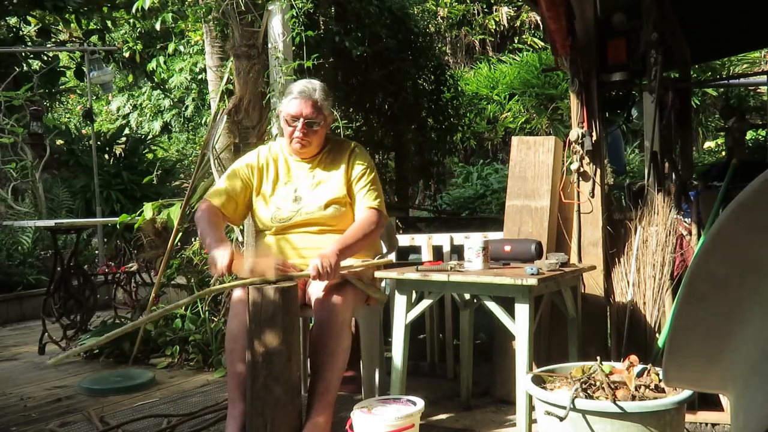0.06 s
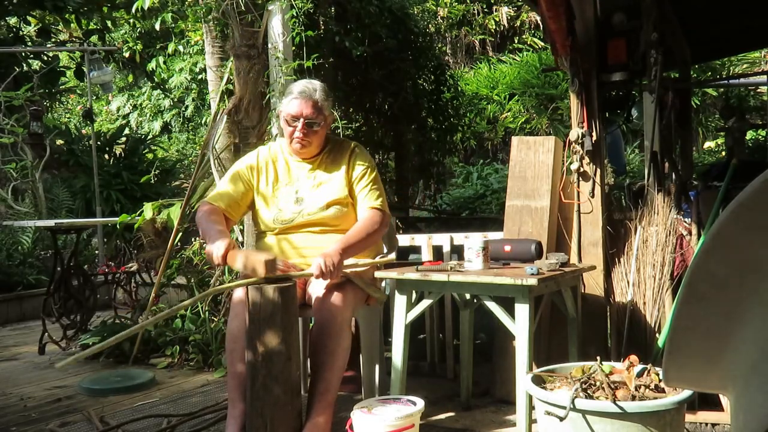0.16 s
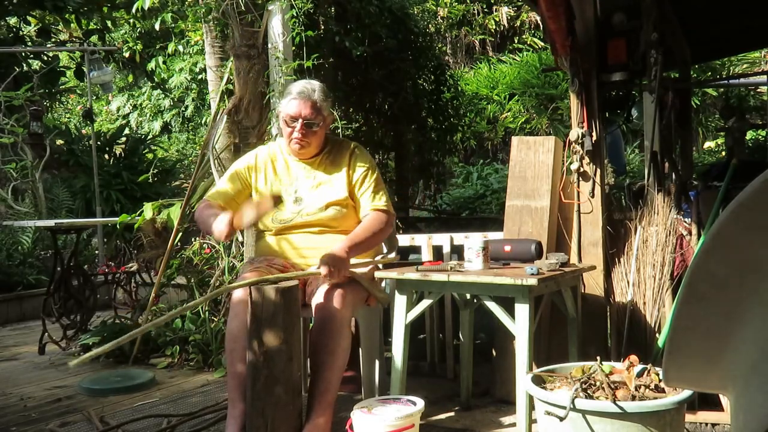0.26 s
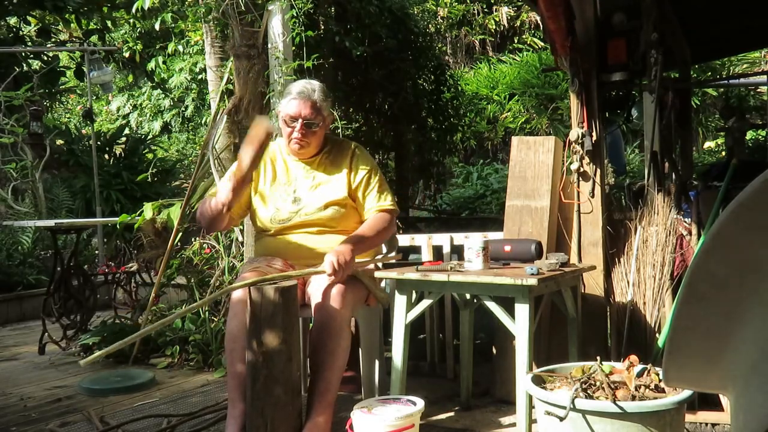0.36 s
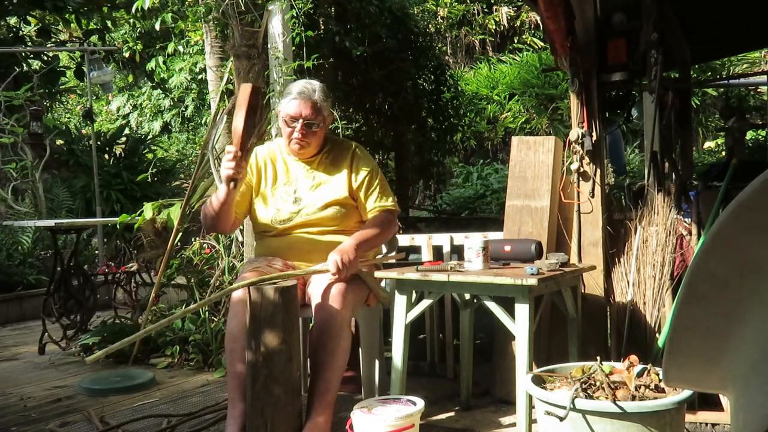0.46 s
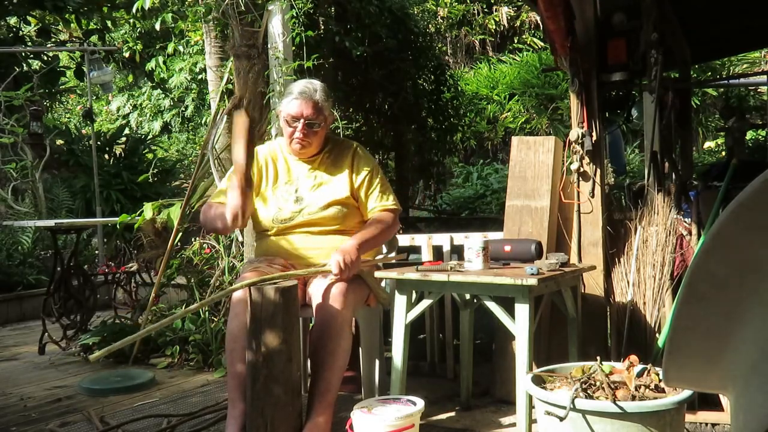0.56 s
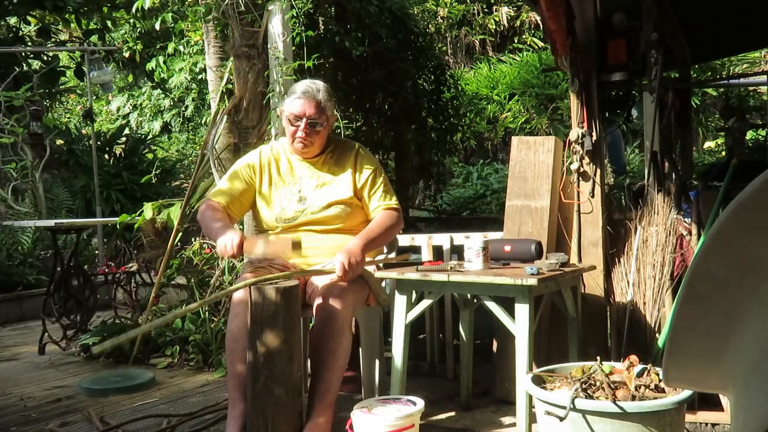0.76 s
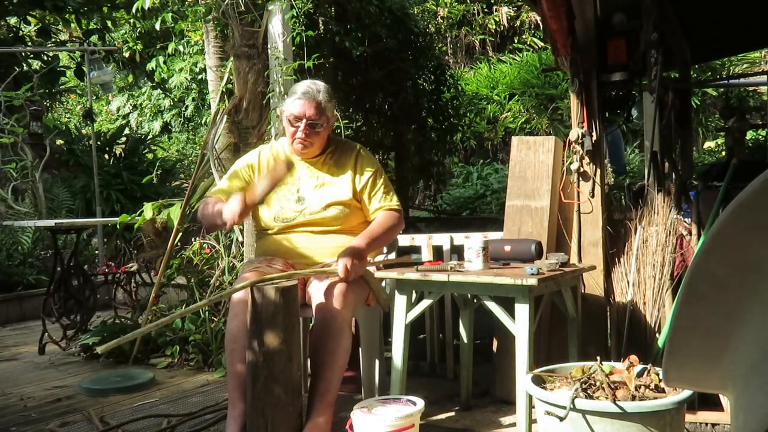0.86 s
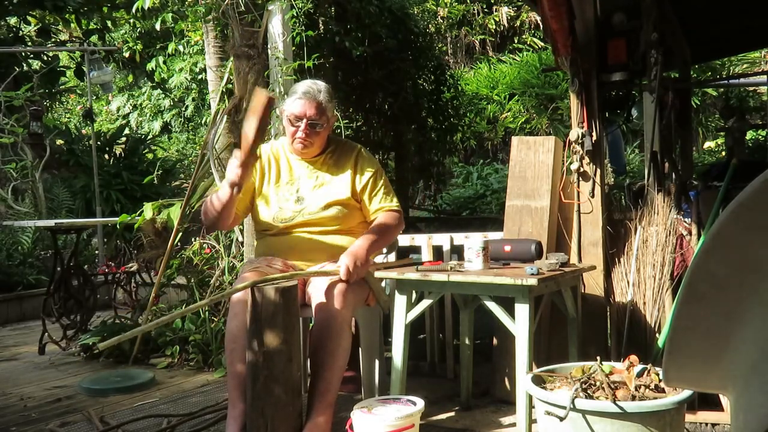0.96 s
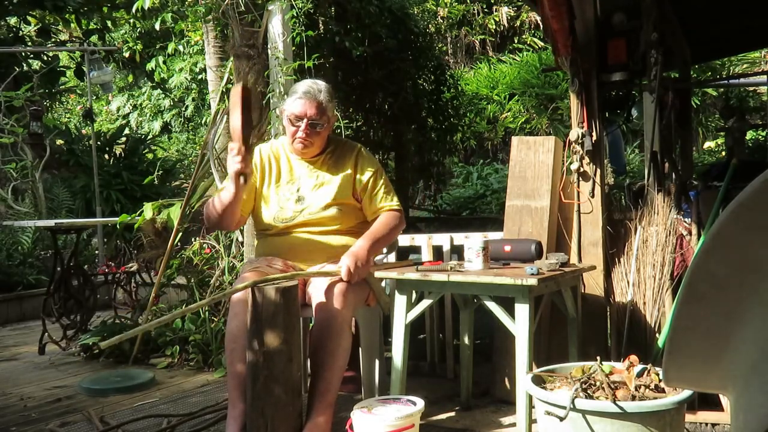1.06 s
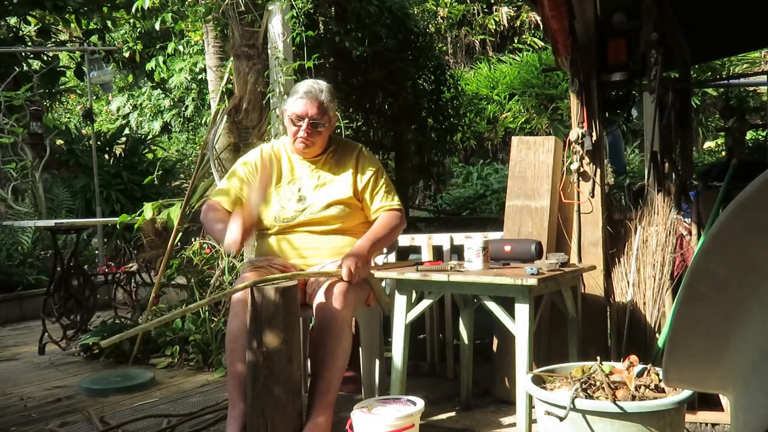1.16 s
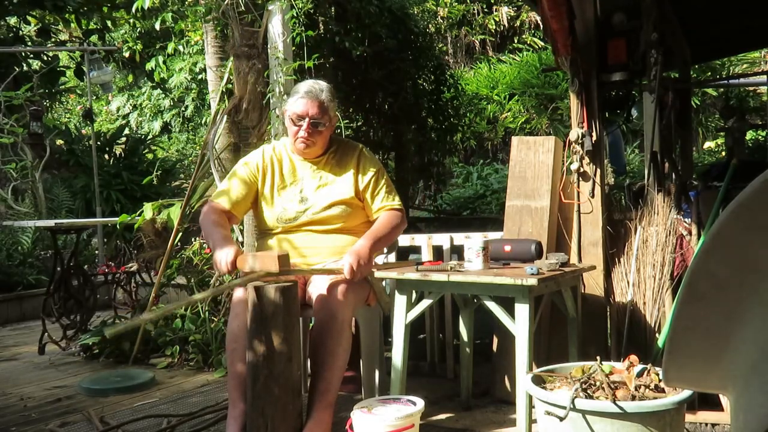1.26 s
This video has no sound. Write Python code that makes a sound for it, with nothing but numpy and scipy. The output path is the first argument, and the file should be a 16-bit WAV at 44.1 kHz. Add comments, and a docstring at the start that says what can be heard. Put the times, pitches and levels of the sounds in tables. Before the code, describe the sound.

In a quiet garden, two loud, dry knocks ring out about half a second apart as a wooden mallet pounds bark on a log near the microphone. Soft air rumble and a far motor hum continue behind them.

```python
"""Two sharp knocks: a wooden mallet pounds a strip of bark on an upright log, on a deck in a quiet garden.
Each blow is a crack of crushed fibres, a clack of the mallet's modes and a thud of log and deck,
scattered by the roof and furniture. Behind them a far motor hums, the air rumbles and, near the end,
an insect trills faintly. The knocks overload the recorder, whose gain control ducks the background
and lets it creep back."""
import sys
import numpy as np
from scipy import signal
from scipy.io import wavfile

SR = 44100
rng = np.random.default_rng(int(sys.argv[2]) if len(sys.argv) > 2 else 0)


def bounce(signal):
    """Save signal as a 16-bit WAV file at the path given by the first command-line argument."""
    frames = np.transpose(np.atleast_2d(signal))
    limited = np.clip(frames, -1, 1)
    pcm = np.round(limited * 32767).astype(np.int16)
    wavfile.write(sys.argv[1], SR, pcm)


N = 57330

# stereo width of crack and scatter: f/Hz, side level/dB relative to mid
KNOCK_WIDTH = [(100, -23.5), (400, -13.5), (1500, -12.5), (4000, -6), (12000, -4)]


def knocks():
    """Impact excitation: each blow sets off a clack, a crack, a thud and their reflections."""
    # mallet blows: t/s, overall level/dB, gains of clack/dB, crack/dB, thud/dB, scatter/dB, left-right/dB
    blows = [(0.2268, -1.5, -1, -2, 0, -0.5, 0), (0.8006, -1.5, 0, 2, 1, 2.5, 0)]
    out = 0
    for k, (start, db, clack_db, crack_db, thud_db, scatter_db, pan_db) in enumerate(blows):
        t = since(start)
        contact = from_db(clack_db) * mallet_clack(t, k) + from_db(crack_db) * bark_crack(t)
        thud = from_db(thud_db) * (air_shove(t) + log_thud(start))
        blow = contact + near_echoes(contact) + thud + from_db(scatter_db) * scatter(t)
        out = out + from_db(db + pan_db * np.array([[.5], [-.5]])) * blow
    return out


def mallet_clack(t, blow_index):
    """Modal vibration: the point of impact sets how strongly each mode of the head rings."""
    # mallet head modes: f/Hz, level in first blow/dB, level in second blow/dB, T60/s
    head_modes = [(716, -9.5, 4.5, 0.036), (1060, 3, -4, 0.04), (1289, 6.5, -3, 0.026),
                  (1509, 3, 9.5, .035), (1721, 9, 9, .028), (2052, 10, 0.5, 0.033),
                  (2301, -8.5, -4.5, 0.05), (2713, 5, 10.5, 0.022), (3200, 4.5, -6, .02),
                  (3760, 2, 2.5, 0.026), (5810, 6, -2.5, .018), (6340, 2, -3.5, .018),
                  (7370, -2.5, -8, 0.022)]
    modes = [(hz, levels[blow_index], t60) for hz, *levels, t60 in head_modes]
    return struck(modes[::2], t) - struck(modes[1::2], t)   # neighbouring modes alternate in sign


def bark_crack(t, contact_s=.0031, t60=.011, gain_db=8):
    """Fracture noise: fibres crush for a few milliseconds while the mallet is in contact."""
    # spectrum of crushing bark: f/Hz, relative density level/dB
    crush_spectrum = [(200, -13.5), (600, -7.5), (1500, 0.5), (2800, -3), (5000, -14.5), (9000, -15.5),
                      (15000, -15)]
    grit = sum(band for _, band in noise_bands(crush_spectrum, KNOCK_WIDTH))
    return from_db(gain_db) * grit * (t > 0) * dying(np.maximum(t - contact_s, 0), t60)


def log_thud(start, lag_s=.0025):
    """Free vibration: the log and deck ring once the bark is squashed."""
    # modes of log and deck: f/Hz, level/dB, T60/s
    log_modes = [(82, -19, 0.17), (114.5, -9.5, 0.15), (147.6, -2, 0.14), (199.3, -9.5, .24),
                 (251.8, -6, 0.13), (285, -13.5, .12), (360.7, -8, 0.23), (445, -12, 0.18),
                 (467, -8.5, .16), (518.8, -7, 0.17), (628, -15.5, 0.073), (789, -16.5, 0.075)]
    return -struck(log_modes, since(start + lag_s))


def air_shove(t, push_s=.003, gain_db=1.5):
    """Acceleration noise: one low push and pull of air as the mallet stops on the log."""
    u = t / push_s
    return from_db(gain_db) * 2 * np.pi * u * (1 - u) * np.exp(-u ** 2)


def near_echoes(x, cutoff_hz=9300):
    """Specular reflection: the deck and a table each return one dulled copy."""
    # echoes from the nearest hard surfaces: delay t/s, level/dB
    echoes = [(.0079, -22.5), (0.01, -14.5)]
    dull = smooth(x.mean(axis=0), 1 / (2 * np.pi * cutoff_hz))
    return sum(from_db(db) * delayed(dull, delay) for delay, db in echoes)


def scatter(t, rise_s=.004, tail_db=-19, gain_db=.5):
    """Diffuse reflection: dense echoes build up, die quickly and leave a faint longer tail."""
    # spectrum scattered by the surroundings: f/Hz, relative density level/dB
    spectrum = [(45, -17), (90, 3.5), (160, 6), (450, 5.5), (700, -3), (1100, -3.5), (1900, -1), (3200, -7),
                (6000, -16.5), (9000, -23.5), (12000, -24), (15500, -26.5)]
    # decay of the early scatter: f/Hz, T60/s
    early_t60 = [(100, .2), (500, .16), (2000, .14), (6000, 0.18), (14000, .16)]
    # decay of the tail: f/Hz, T60/s
    tail_t60 = [(100, 0.81), (500, 0.51), (2000, 0.45), (12000, 0.34)]
    wash = 0
    for hz, band in noise_bands(spectrum, KNOCK_WIDTH):
        early = dying(t, at_hz(early_t60, hz))
        tail = from_db(tail_db) * dying(t, at_hz(tail_t60, hz))
        wash = wash + band * (early + tail)
    return from_db(gain_db) * (1 - np.exp(-t / rise_s)) * wash


def motor_hum(waver_db=.5, waver_hz=5.1):
    """Random modulation: the low tones of a far motor waver in frequency and amplitude."""
    # motor tones: f/Hz, rms level/dB, rms deviation of f/Hz
    tones = [(30, -50.5, 1.5), (96.6, -49, 5.6), (157.5, -38.5, 2.2)]
    out = 0
    for hz, db, wander_hz in tones:
        phase = 2 * np.pi * np.cumsum(hz + wander_hz * drift(waver_hz)) / SR
        out = out + from_db(db + waver_db * drift(waver_hz)) * np.sqrt(2) * np.sin(phase)
    return out


def garden_air(level_db=-39.5):
    """Stationary noise: a steady outdoor rumble and hiss."""
    # spectrum of the garden air: f/Hz, relative density level/dB
    spectrum = [(22, 7.5), (32, 9.5), (55, 9), (95, 15), (125, 12), (190, 7), (250, 2), (600, -1.5),
                (1200, -8), (3500, -15.5), (7000, -27), (14000, -36)]
    # its stereo width: f/Hz, side level/dB relative to mid
    width = [(100, -20), (500, -1), (3000, -5), (12000, -3)]
    return from_db(level_db) * sum(band for _, band in noise_bands(spectrum, width))


def insect(start_s=1.03, rise_s=.055, hz=4005, level_db=-62.5):
    """Amplitude modulation: one thin, fluttering tone makes a faint trill in the bushes."""
    t = since(start_s)
    envelope = from_db(level_db + 2 * drift(rate_hz=22)) * np.minimum(t / rise_s, 1)
    return envelope * np.sin(2 * np.pi * hz * t)


def struck(modes, t):
    """Modal superposition: a struck body sounds as a sum of damped sines."""
    return sum(from_db(db) * dying(t, t60) * np.sin(2 * np.pi * hz * t) for hz, db, t60 in modes)


def noise_bands(spectrum, width):
    """Spectral shaping: half-octave stereo noise as (f/Hz, band), with a total mid rms near 1."""
    edges = 20 * 2 ** np.arange(0, 10.1, .5)
    centres = np.sqrt(edges[:-1] * edges[1:])
    gains = from_db(at_hz(spectrum, centres))
    gains = gains / np.sqrt(np.sum(gains ** 2 * np.diff(edges)) * 2 / SR)
    white = rng.standard_normal((2, 2, N + SR // 4))   # neighbouring bands use independent noise
    bands = []
    for k, hz in enumerate(centres):
        bandpass = signal.butter(2, edges[k:k + 2], "band", fs=SR, output="sos")
        mid, side = signal.sosfilt(bandpass, white[k % 2])[:, -N:]
        stereo = mid + from_db(at_hz(width, hz)) * side * [[1], [-1]]
        bands.append((hz, gains[k] * stereo))
    return bands


def drift(rate_hz):
    """Low-passed noise: a slow random motion of rms 1."""
    seconds = 1 / (2 * np.pi * rate_hz)
    motion = smooth(smooth(rng.standard_normal(2 * N), seconds), seconds)[N:]
    return motion / np.sqrt(np.mean(motion ** 2) + 1e-20)


def from_db(db):
    """Amplitude ratio of a level in decibels."""
    return 10 ** (np.asarray(db) / 20)


def at_hz(points, hz):
    """Interpolation on a log-frequency axis."""
    frequencies, values = np.array(points).T
    return np.interp(np.log(hz), np.log(frequencies), values)


def since(start):
    """Seconds since a moment, zero before it."""
    return np.maximum(np.arange(N) / SR - start, 0)


def dying(t, t60):
    """Exponential decay, by 60 dB in t60 seconds."""
    return np.exp(-np.log(1000) * t / t60)


def smooth(x, seconds):
    """One-pole low-pass with the given time constant."""
    pole = np.exp(-1 / (seconds * SR))
    return signal.lfilter([1 - pole], [1, -pole], x + 1e-18)


def delayed(x, seconds):
    """Time shift by linear interpolation."""
    return np.interp(np.arange(N) - seconds * SR, np.arange(N), x)


def scene():
    """Superposition: the knocks add to the quiet garden."""
    return knocks() + motor_hum() + garden_air() + insect()


def gain_control(x, threshold_db=-5, detect_s=.0022, attack_s=.00068, lookahead_s=.00044):
    """Limiting: the gain drops quickly on a loud sound and recovers at a steady rate."""
    level_db = 10 * np.log10(smooth(np.mean(x ** 2, axis=0), detect_s) + 1e-12)
    excess_db = np.maximum(level_db - threshold_db, 0)
    recovery_db = 7.5 * since(0)   # 7.5 dB/s
    cut_db = np.maximum.accumulate(excess_db + recovery_db) - recovery_db
    return x * from_db(-delayed(smooth(cut_db, attack_s), -lookahead_s))


def record(dry):
    """Saturation: peaks that pass the gain control clip softly, ahead of a steep low-pass."""
    ceiling, cutoff_hz = 1.05, 15600
    clipped = ceiling * np.tanh(gain_control(dry) / ceiling)
    return signal.sosfilt(signal.ellip(10, .2, 70, cutoff_hz, fs=SR, output="sos"), clipped)


dry = scene()
out = record(dry)
bounce(out)
```